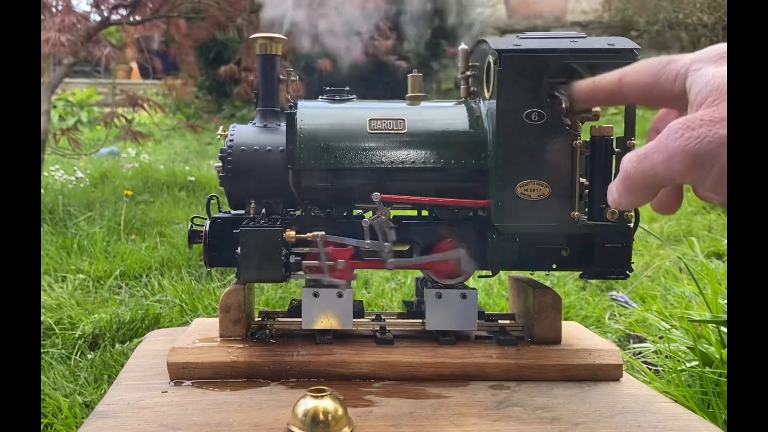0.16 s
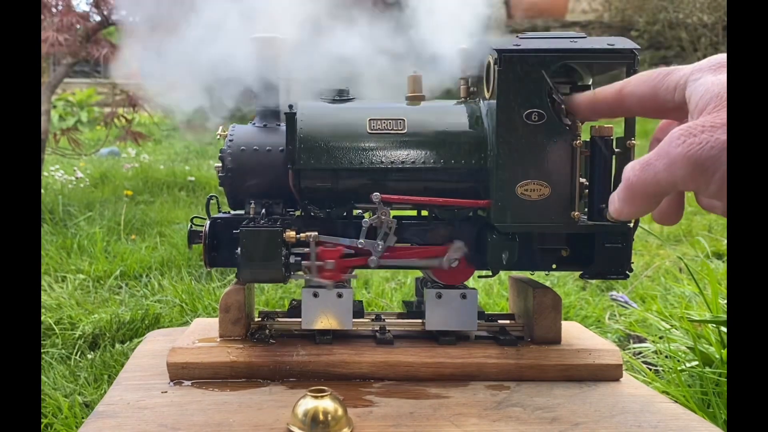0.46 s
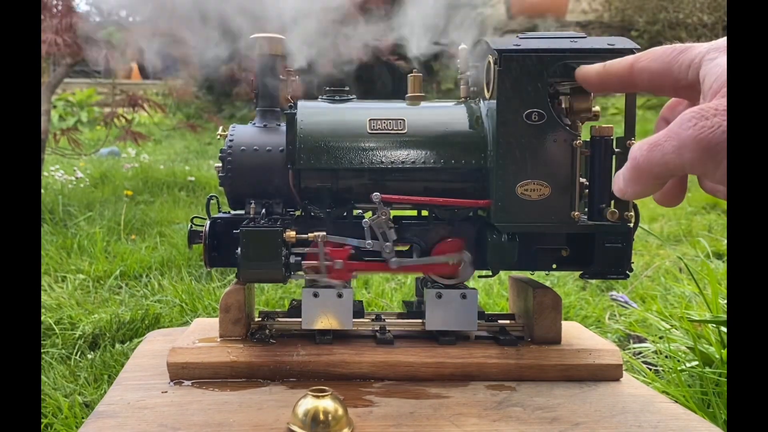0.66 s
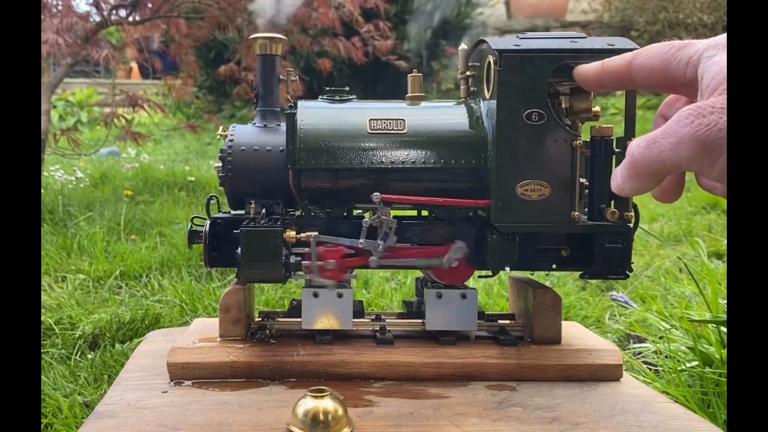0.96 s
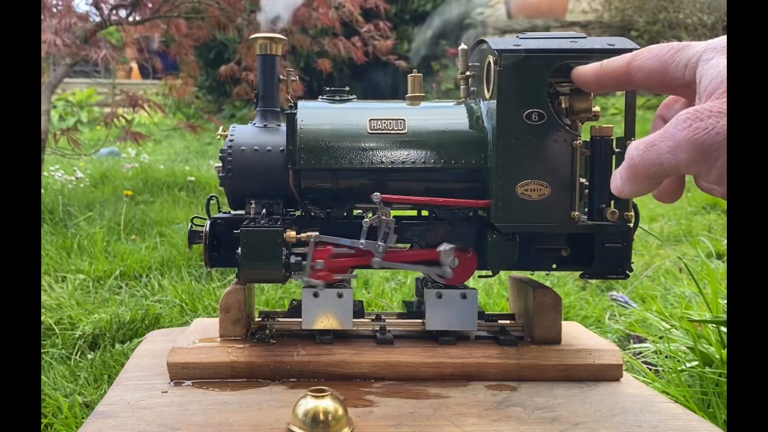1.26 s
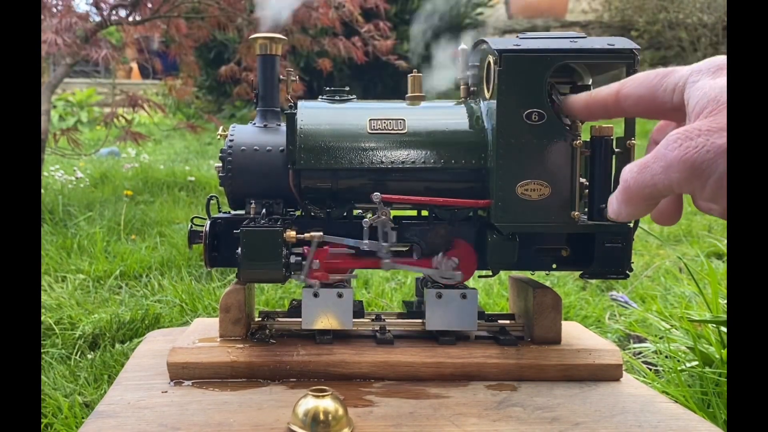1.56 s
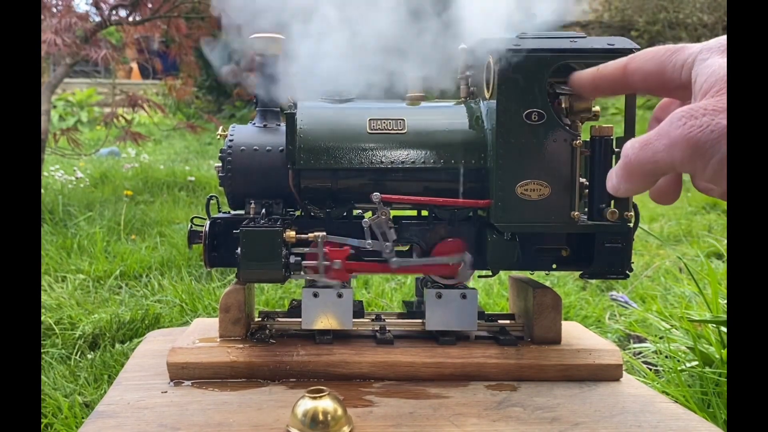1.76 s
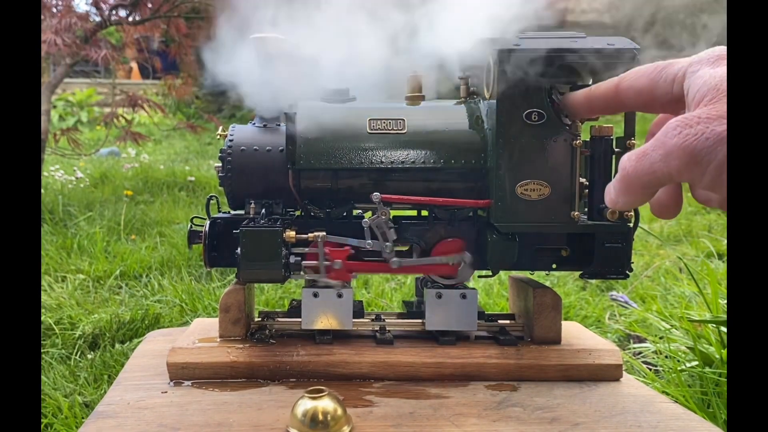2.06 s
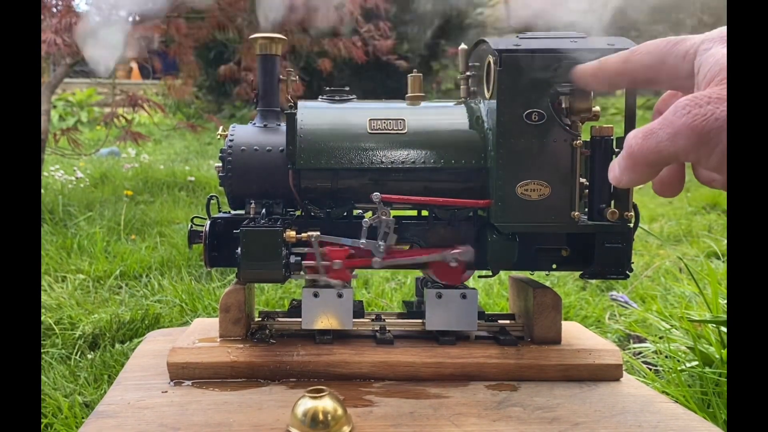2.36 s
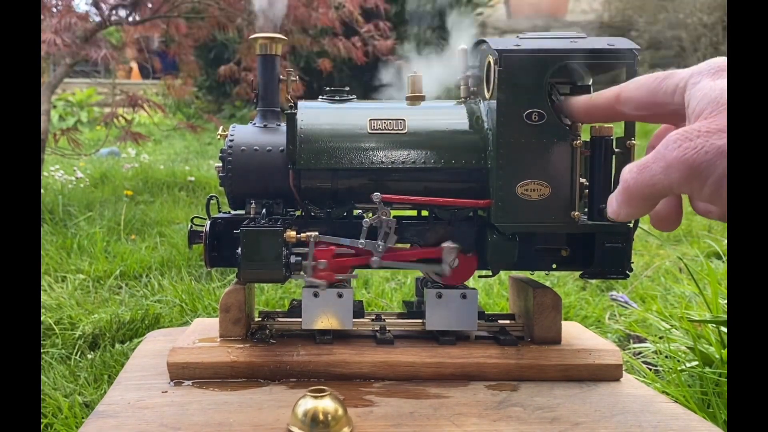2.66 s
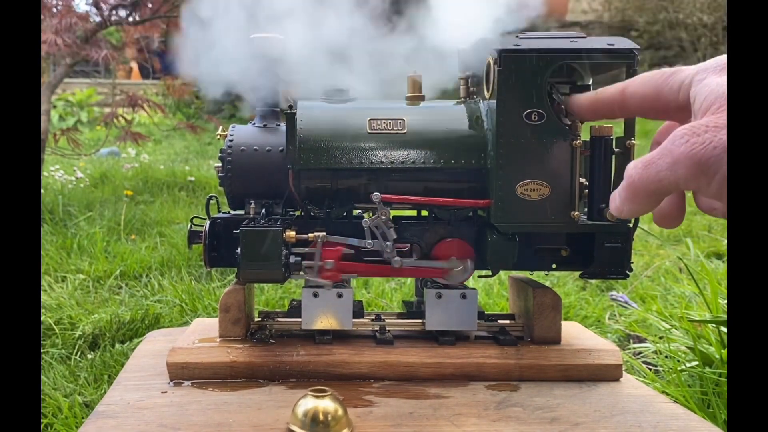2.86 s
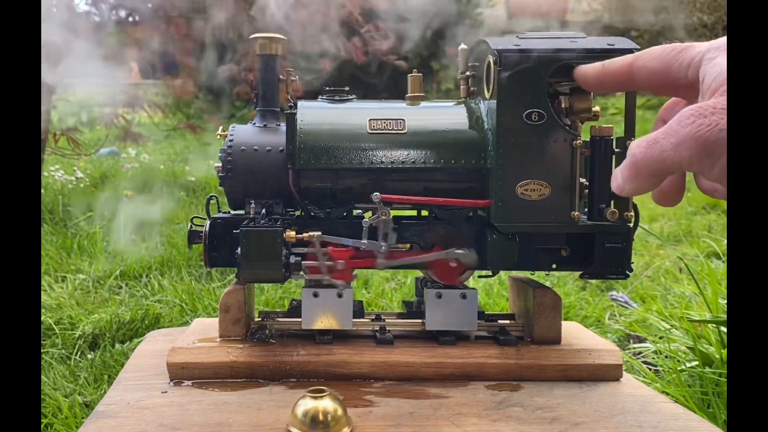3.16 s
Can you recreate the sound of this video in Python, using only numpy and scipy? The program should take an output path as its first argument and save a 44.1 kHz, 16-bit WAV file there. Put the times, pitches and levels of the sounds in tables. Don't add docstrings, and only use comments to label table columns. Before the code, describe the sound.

Miniature steam locomotive puffing fast on rollers, interrupted by four breathy, choked whistle hisses

```python
import sys
import numpy as np
from scipy import signal
from scipy.fft import rfft, irfft
from scipy.io import wavfile

SR = 44100
rng = np.random.default_rng(int(sys.argv[2]) if len(sys.argv) > 2 else 0)


def invert_db(level):
    return 10 ** (np.asarray(level, dtype=float) / 20)


def output_pcm(signal):
    pcm = np.clip(np.atleast_2d(signal).T, -1, 1) * 32767
    wavfile.write(sys.argv[1], SR, np.round(pcm).astype(np.int16))


N = 145530
T = np.arange(N) / SR
HZ = np.fft.rfftfreq(N, 1 / SR)

# hz, phase_rad, likeness_0_1, left_right_db
JET_PORTS = [(300, -0.1, 0.96, 0.82), (1000, 0.13, 0.93, 0.36), (3480, -.2, 0.94, 0.14),
             (4560, -0.22, 0.63, 0.8), (6600, 0.2, 1, 0)]


def drift(rate_hz):
    settle = 9000
    r = np.exp(-2 * np.pi * rate_hz / SR)
    slow = signal.lfilter([1], [1, -2 * r, r * r], rng.standard_normal(N + settle))[settle:]
    return slow / slow.std()


def peak(hz, width_hz):
    return 1 / np.sqrt(1 + ((HZ - hz) / (width_hz / 2)) ** 2)


def colour(points):
    hz, db = np.transpose(points)
    return invert_db(np.interp(np.log(HZ + 1), np.log(hz), db))


def steam(envelope, gain, ports, blur, shift_hz=0):
    comb_from_hz, comb_turn_hz = 6950, 4230
    noise = rfft(rng.standard_normal((2, N)) * envelope)
    near, other = noise * gain / np.sqrt(np.mean(gain ** 2))
    hz, *columns = np.transpose(ports)
    phase, alike, pan_db = [np.interp(HZ, hz, c) for c in columns]
    comb = 2 * np.pi * np.maximum(HZ - comb_from_hz - shift_hz, 0) / comb_turn_hz
    alike = np.clip(alike - blur * np.sin(comb) ** 2, 0, 1)
    right = alike * near * np.exp(1j * (phase + comb)) + np.sqrt(1 - alike ** 2) * other
    return irfft([near * invert_db(pan_db / 2), right * invert_db(-pan_db / 2)], N)


def rumble():
    # hz, db_per_hz
    floor = [(25, -37), (62, 1), (110, -8.5), (160, -4.5), (250, -12), (500, -15), (900, 4.5), (3000, -68)]
    return steam(invert_db(-44.5 + 0.97 * drift(15.0)), colour(floor), JET_PORTS, blur=.4)


def valve(swell_share):
    # opens_s, shuts_s, level_db, swell_db, opening_s
    blasts = [
        (0.169, 0.463, -16.5, 2.5, 0.032),
        (1.524, 1.673, -16.5, 12.5, 0.0097),
        (1.849, 2.102, -17.5, -0.5, 0.021),
        (2.617, 2.867, -16, 9, 0.0079),
    ]
    swell_s, sag_db_per_s, shut_db_per_s = 0.077, 12, 418
    flow = 0
    for opens_s, shuts_s, db, swell_db, opening_s in blasts:
        age_s = np.maximum(T - opens_s, 0)
        unswollen_db = swell_share * swell_db * np.clip(1 - age_s / swell_s, 0, 1)
        shut_db = shut_db_per_s * np.maximum(T - shuts_s, 0)
        fall_db = unswollen_db + sag_db_per_s * age_s + shut_db
        flow = flow + np.minimum(age_s / opening_s, 1) ** 2 * invert_db(db - fall_db)
    return flow


def water():
    # centre_s, length_s, level_db
    spits = [
        (0.235, 0.045, -33.5),
        (0.459, 0.0092, -34),
        (1.59, 0.034, -32.5),
        (1.663, 0.016, -37.5),
        (2.082, 0.041, -39),
        (2.665, 0.058, -34.5),
        (2.776, 0.052, -42.5),
        (2.868, 0.032, -39.5),
    ]
    return sum(invert_db(db) * np.exp(-((T - s) / length_s) ** 2) for s, length_s, db in spits)


def whistle():
    # hz, db_per_hz
    jet = [(120, -50), (280, -25), (4300, -11), (6000, -3), (8300, -4), (9200, -1.5), (11800, -2),
           (15300, -1.5)]
    # hz, db_per_hz
    splash = [(120, -45), (300, -0.5), (700, 8.5), (1500, 1), (3000, -14)]
    puffs = water()
    rough_db = 0.92 * drift(67.0) + 20 * np.log10(1 + 6.1 * 0.67 * puffs)
    hiss_flow = valve(0.87) * invert_db(rough_db + 1.4 * drift(5.0))
    hiss = steam(hiss_flow, colour(jet), JET_PORTS, blur=.3)
    note_flow = valve(1) * invert_db(-9 + rough_db + 2.3 * drift(7.7))
    note = steam(note_flow, peak(7005, 1450) ** 2, JET_PORTS, blur=0.57)
    spat = steam(puffs * invert_db(1.76 * drift(70.0)), colour(splash), JET_PORTS, blur=.3)
    return hiss + note + spat


def beats():
    # start_s, strength_db
    turns = [(-.085, 2.5), (0.042, 1.5), (0.168, 4), (0.292, 1.5), (0.425, -0.5), (0.56, 0.5), (.675, 2.5),
             (0.803, 1), (.929, 2), (1.065, 1.5), (1.209, 1.5), (1.344, 1), (1.487, 0.5), (1.627, -1),
             (1.784, 0.5), (1.927, -2), (2.08, -2), (2.218, 1), (2.345, 1.5), (2.475, 1), (2.615, 0),
             (2.76, -1), (2.902, 2), (3.029, 2.5), (3.153, -0.5), (3.283, -0.5), (3.41, 0)]
    # share_of_turn, level_db
    strokes = [
        (.01, 1),
        (0.248, 1),
        (0.462, 1),
        (0.728, -1),
    ]
    rise_s, fall_s, jitter_s, scatter_db = 0.0043, 0.021, .0006, .8
    pressure = np.zeros(N)
    for (start_s, turn_db), (next_s, _) in zip(turns, turns[1:]):
        for share, stroke_db in strokes:
            early, strong = rng.standard_normal(2)
            beat_s = start_s + share * (next_s - start_s) + jitter_s * early
            age_s = np.maximum(T - beat_s, 0)
            pulse = (1 - np.exp(-age_s / rise_s)) * np.exp(-age_s / fall_s)
            pressure = np.maximum(pressure, invert_db(turn_db + stroke_db + scatter_db * strong) * pulse)
    return pressure


def chimney_gain():
    # hz, db_per_hz
    blast = [(200, -38.5), (600, -15), (1200, -10), (2000, -2.5), (4200, -10), (6200, -19), (8500, -15),
             (13300, -27.5)]
    # hz, width_hz, level_db
    chimney = [(1381.5, 42.5, 9.5), (2044, 410, -1), (2415, 40, -8.5), (2690, 57, -1), (4004, 35, 2.5),
               (4270, 140, 3.5), (4600, 230, -5.5), (8520, 520, -6), (11800, 300, -3)]
    # hz, width_hz, depth_0_1
    dips = [(1250, 60, .6), (3850, 40, .7), (4170, 60, .7)]
    modes = [*chimney, (15370, 2000, 9.5)]
    ringing = 1 + sum(invert_db(db) * peak(hz, width_hz) ** 2 for hz, width_hz, db in modes)
    notches = np.prod([1 - depth * peak(hz, width_hz) ** 2 for hz, width_hz, depth in dips], axis=0)
    return colour(blast) * ringing * notches


def engine():
    # hz, phase_rad, likeness_0_1, left_right_db
    engine_ports = [(300, 0.24, 0.93, 6), (910, -0.14, 0.98, -1.5), (1300, 0.88, 0.75, 5),
                    (2140, -1.02, 0.83, -2), (2670, -0.56, 0.39, 2), (3550, -1.74, 0.94, 8),
                    (4860, -0.46, 0.33, 7), (7000, -0.14, .9, -0.5)]
    comb_shift_hz, pressure_loss_db = -130, -1.5
    drawn = valve(1)
    push = beats() * invert_db(pressure_loss_db * drawn / drawn.max())

    exhaust_flow = (push + .15) * invert_db(1 * drift(90.0))
    exhaust = steam(exhaust_flow, chimney_gain(), engine_ports, blur=.2, shift_hz=comb_shift_hz)

    leak_edge = 1 + np.exp(np.clip((9000 - HZ) / 80, -50, 50))
    sizzle = peak(9407, 805) ** 2 / leak_edge
    leak_flow = (push + 0.046) * invert_db(1.66 * drift(120.0))
    leak = steam(leak_flow, sizzle, engine_ports, blur=0.03, shift_hz=2 * comb_shift_hz)

    flue_flow = (push + 0.16) * invert_db(1 * drift(11.6))
    flue = steam(flue_flow, peak(855.2, 114) ** 2, engine_ports, blur=0)
    return invert_db(-26.5) * exhaust + invert_db(-26) * leak + invert_db(-35) * flue


def scene():
    return rumble() + whistle() + engine()


def roll_off(x):
    return signal.sosfilt(signal.butter(12, 16980, fs=SR, output="sos"), x)


def record(dry):
    return roll_off(dry)


dry = scene()
out = record(dry)
output_pcm(out)
```